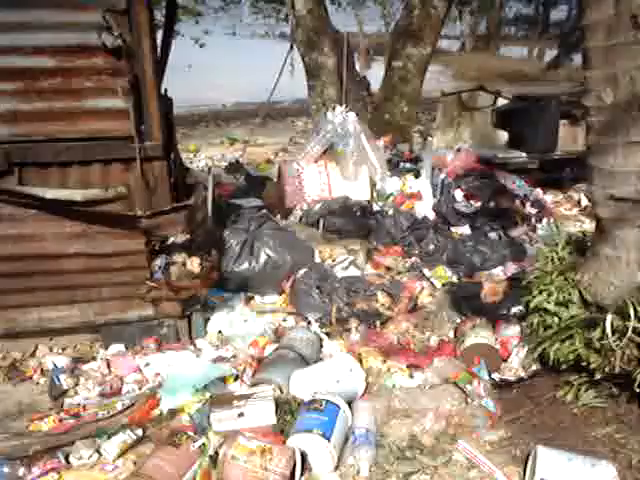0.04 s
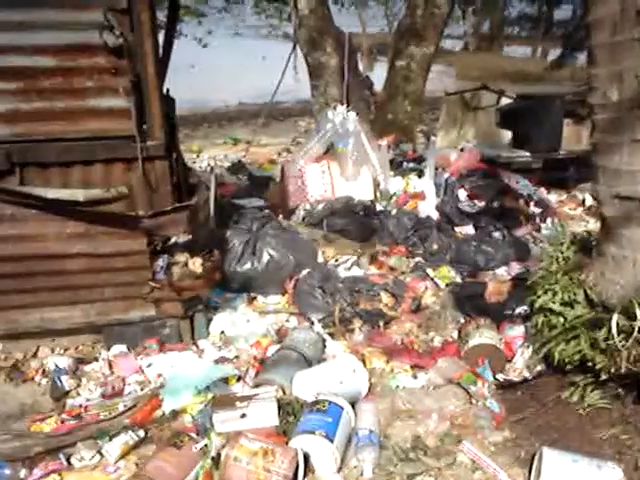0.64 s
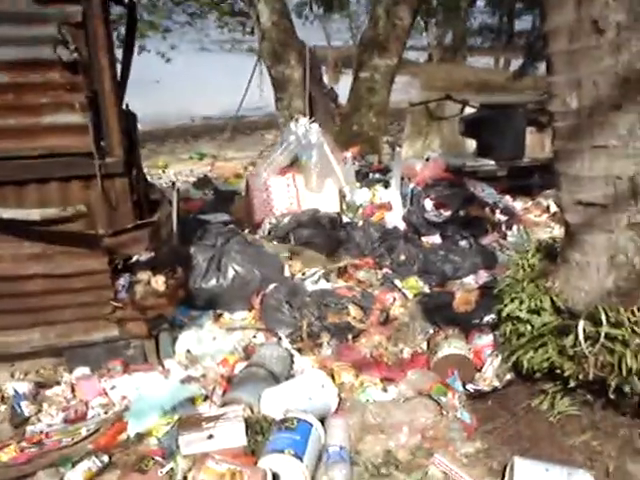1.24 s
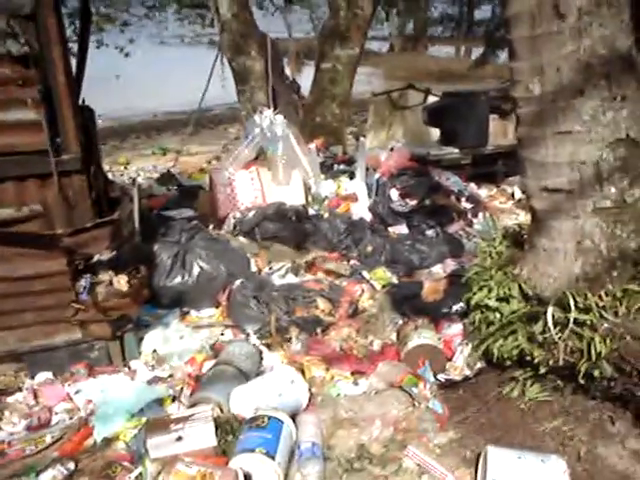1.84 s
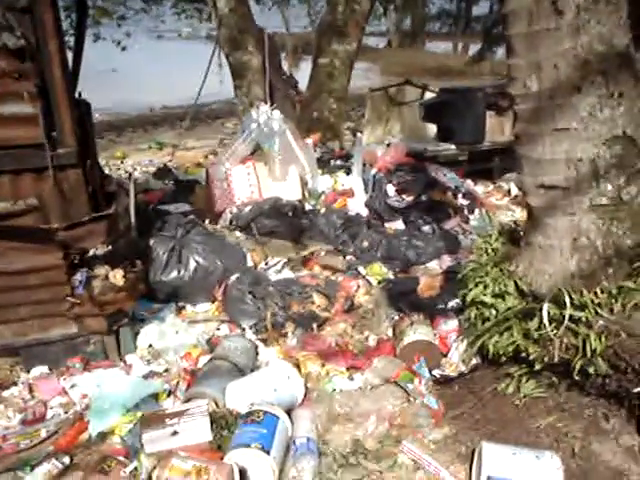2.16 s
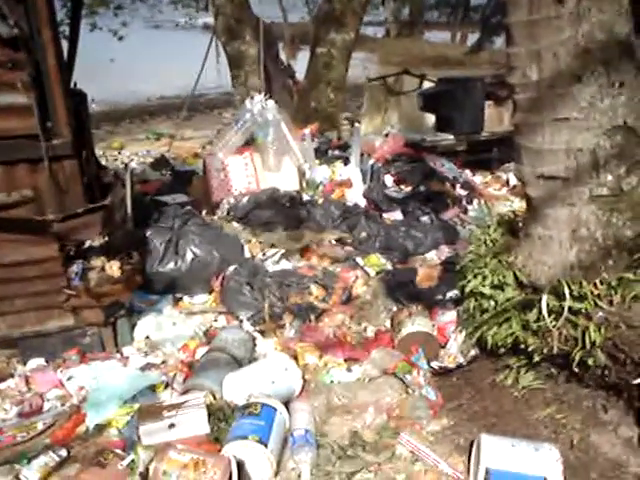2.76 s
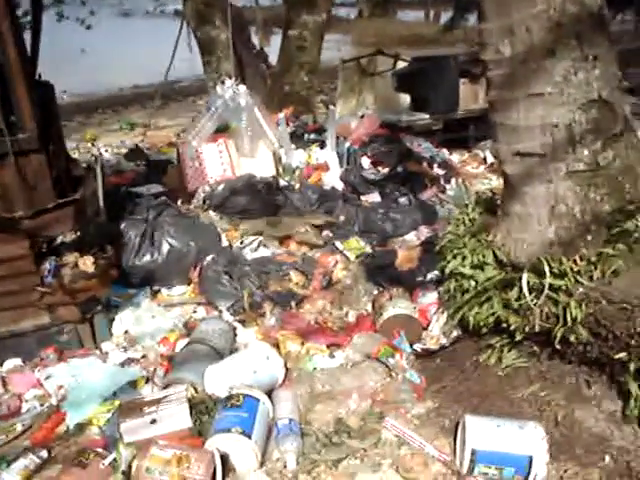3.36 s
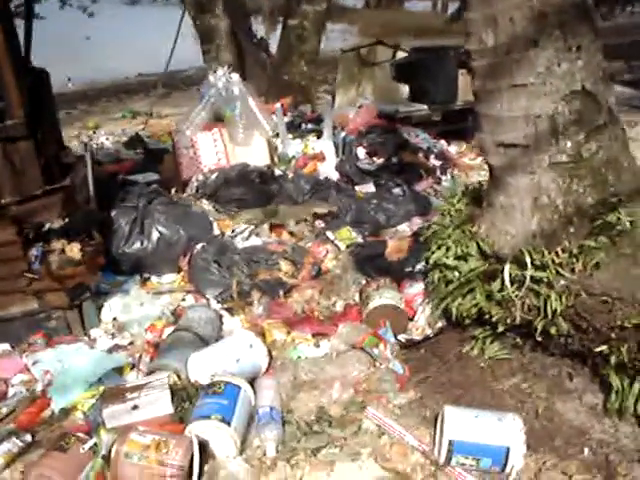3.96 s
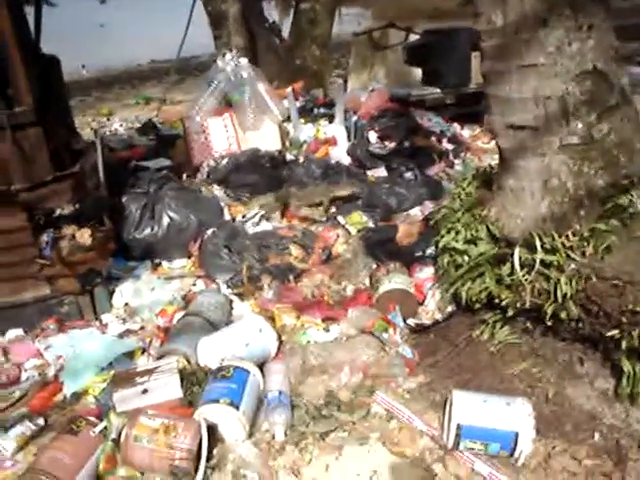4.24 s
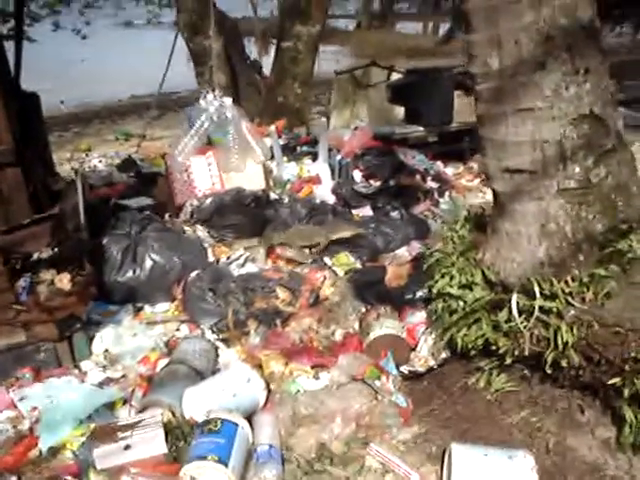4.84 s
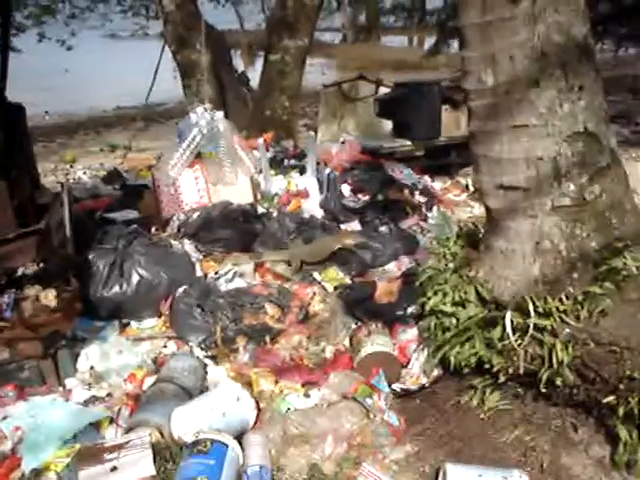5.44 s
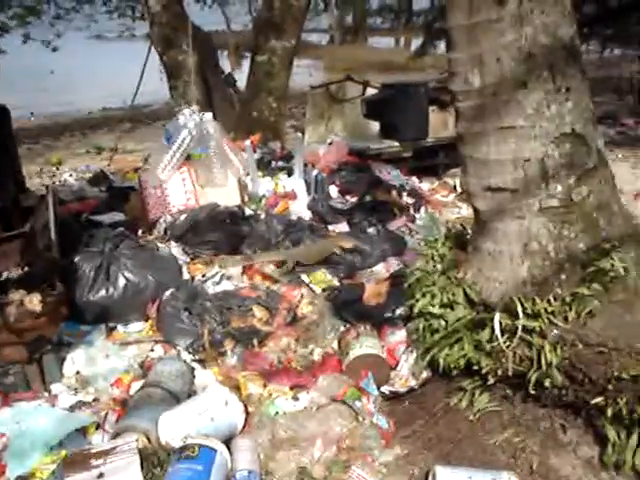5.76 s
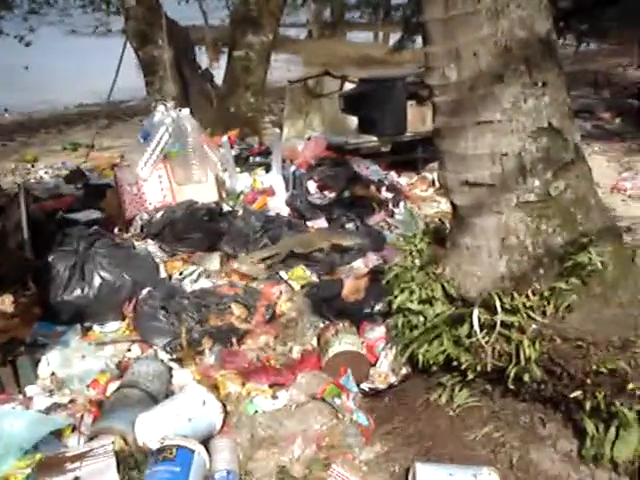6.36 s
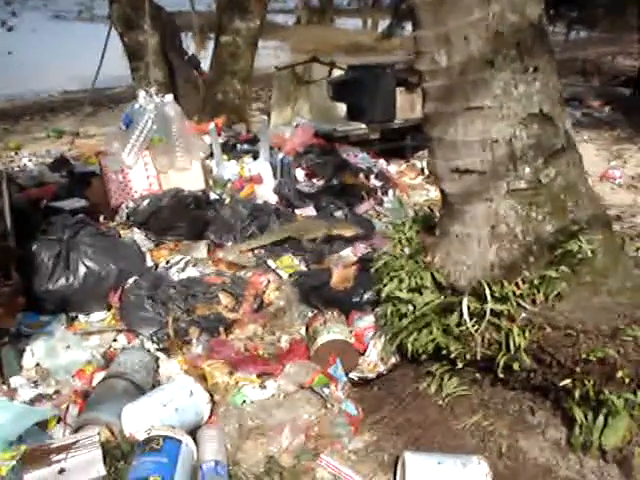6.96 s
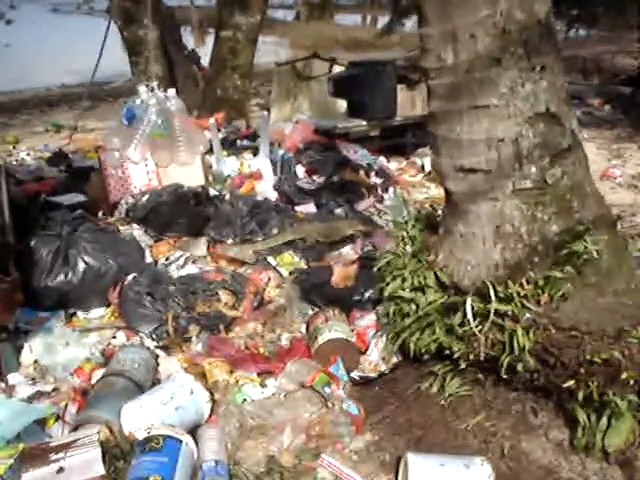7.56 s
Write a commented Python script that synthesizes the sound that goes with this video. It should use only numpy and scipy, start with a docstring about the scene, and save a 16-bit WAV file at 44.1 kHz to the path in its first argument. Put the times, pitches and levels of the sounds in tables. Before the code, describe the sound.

Wind buffets the microphone over a steady wash of water and leaves, while stiff plastic clicks and scrapes close by.

```python
"""Gusts buffet a small microphone over a steady wash of water and leaves, at a rubbish heap by the shore.
Close by, stiff plastic is handled: it clicks and ticks as it buckles and its panels ring, and twice
it scrapes in a quick run of slips. Thin plastic rustles faintly, soft contacts scuff, and a few
thin chirps come from far off."""
import sys
import numpy as np
from scipy import signal
from scipy.fft import rfft, irfft, next_fast_len
from scipy.io import wavfile
from scipy.ndimage import uniform_filter1d, map_coordinates

SR = 44100
rng = np.random.default_rng(int(sys.argv[2]) if len(sys.argv) > 2 else 0)


def transcribe(signal):
    """Save signal, clipped to [-1, 1], as a 16-bit WAV file at the path in sys.argv[1]."""
    frames = np.atleast_2d(signal).T
    limited = np.clip(frames, -1, 1)
    pcm = np.round(limited * 32767).astype(np.int16)
    wavfile.write(sys.argv[1], SR, pcm)


N = 334719


def amp(db):
    """Decibels to gain."""
    return 10 ** (np.asarray(db) / 20)


def unit(x):
    """x at rms 1."""
    return x / np.sqrt(np.mean(x ** 2) + 1e-20)


def add(out, start_s, sound):
    """Mix a sound into out."""
    out[round(start_s * SR):][:len(sound)] += sound


def wobble(rate_hz):
    """Smooth random curve, rate_hz knots a second."""
    knots = rng.standard_normal(int(N * rate_hz / SR) + 4)
    return map_coordinates(knots, [np.arange(N) * rate_hz / SR])


def swell(mid_s, length_s):
    """Bell-shaped gain, peak 1."""
    return np.exp(-(2 * (np.arange(N) / SR - mid_s) / length_s) ** 2)


def swells(rows, floor_db):
    """Power sum of swells over a steady floor, as a gain."""
    power = sum((amp(db) * swell(mid_s, length_s)) ** 2 for mid_s, length_s, db in rows)
    return np.sqrt(amp(floor_db) ** 2 + power)


def filtered(x, response):
    """x through a frequency response, given as a function of Hz."""
    size = next_fast_len(len(x) + 8192)
    return irfft(rfft(x, size) * response(np.fft.rfftfreq(size, 1 / SR)), size)[:len(x)]


def coloured(x, spectrum):
    """x shaped by (Hz, dB) points, at rms 1."""
    points_hz, db = np.transpose(spectrum)
    return unit(filtered(x, lambda hz: amp(np.interp(np.log(hz + 1), np.log(points_hz), db))))


def resonance(hz, centre_hz, width_hz):
    """Causal response of one damped mode."""
    return 1j * hz * width_hz / (centre_hz ** 2 - hz ** 2 + 1j * hz * width_hz)


def band(x, lo_hz, hi_hz):
    """Causal band-pass."""
    sos = signal.butter(2, [lo_hz, min(hi_hz, .45 * SR)], "band", fs=SR, output="sos")
    return signal.sosfilt(sos, x)


def rush(spectrum, patchy_db):
    """Noise at rms 1, its gain patchy in time and frequency."""
    bins = signal.stft(rng.standard_normal(N), nperseg=512)[2]
    patches = uniform_filter1d(rng.standard_normal(bins.shape), size=5, axis=0)
    patches = unit(uniform_filter1d(patches, size=14, axis=1))
    noise = signal.istft(bins * amp(patchy_db * patches), nperseg=512)[1][:N]
    return coloured(noise, spectrum)


def puff(mid_s, length_s, lo_hz, hi_hz):
    """Soft-edged burst of band noise."""
    envelope = np.exp(-((np.arange(N) / SR - mid_s) / (length_s / 2)) ** 4)
    return envelope * unit(band(rng.standard_normal(N), lo_hz, hi_hz))


def slips(per_s, spread_db):
    """Random impulses of uneven size."""
    impulses = (rng.random(N) < per_s / SR) * rng.choice([-1, 1], N)
    return impulses * amp(spread_db * np.clip(rng.standard_normal(N), -2, 2))


def chirps(half_band_hz=230):
    """Thin, hissy chirps from far off."""
    # Each row: middle in seconds, length in seconds, pitch in Hz, level in dB.
    calls = [(4.26, .09, 7600, -58), (5.1, .12, 4400, -54), (5.8, .09, 4400, -55), (5.96, .11, 7500, -55)]
    return sum(amp(db) * puff(mid_s, length_s, hz - half_band_hz, hz + half_band_hz)
               for mid_s, length_s, hz, db in calls)


def shore(gain_db=0.71, hiss_over_wash_db=-10):
    """Water and leaves make a broad wash under a smooth high hiss."""
    # Each row: time in seconds, level in dB before gain_db.
    levels = [(0.3, -39), (2.04, -39), (2.59, -37.5), (4.1, -39.5), (4.22, -42.5), (4.71, -42.5),
              (6.06, -40.5), (7.04, -40.5), (7.14, -42.5), (7.59, -41.5)]
    # Each row of both: frequency in Hz, relative level in dB.
    wash_spectrum = [(40, -36), (100, -12.5), (200, -3), (400, -3), (570, -0.5), (760, -3.5), (1000, -2),
                     (1600, -5), (2700, -8.5), (4300, -17.5), (6900, -28), (10000, -44.5)]
    hiss_spectrum = [(3000, -29), (5000, 1.5), (7200, -1.5), (8400, 10), (9400, 6.5), (10200, -1)]
    level_db = np.interp(np.arange(N) / SR, *np.transpose(levels))
    wash = amp(0.083 * wobble(rate_hz=4.5)) * rush(wash_spectrum, patchy_db=1.45)
    hiss = coloured(rng.standard_normal(N), hiss_spectrum)
    return amp(level_db + gain_db) * (wash + amp(hiss_over_wash_db) * hiss)


def wind(gain_db=0.9, lull_db=-54, flutter_db=2.0, thump_s=0.031, dull_hz=150):
    """Eddies thump the microphone; stronger gusts reach higher in pitch."""
    # Each row: middle in seconds, length in seconds, level in dB before gain_db.
    gusts = [(0.14, 0.39, -28.5), (0.42, 0.3, -24.5), (0.87, 0.38, -35), (2.15, 0.56, -46),
             (2.5, 0.39, -35.5), (3.02, 0.091, -34), (3.8, 0.27, -40), (4.42, 0.5, -40.5),
             (5.82, 0.22, -40), (6.11, 0.24, -38), (6.9, 0.96, -45)]
    # Single big eddies. Each row: middle in seconds, level in dB before gain_db.
    thumps = [(0.339, -21.5), (0.619, -22), (0.811, -25), (0.89, -27), (1.041, -25.5), (2.31, -34),
              (2.45, -28.5), (2.55, -28), (2.86, -38.5), (4.38, -27), (4.44, -32), (4.68, -31),
              (6.02, -34.5)]
    # Each row: frequency in Hz, relative level in dB.
    rumble_spectrum = [(12, -50), (25, -15.5), (45, -2.5), (68, 0), (100, -1.5), (150, -4), (220, -7.5),
                       (300, -16.5), (450, -49), (900, -57), (2000, -95)]
    buffet = swells(gusts + [(mid_s, thump_s, db) for mid_s, db in thumps], lull_db)
    buffet_db = 20 * np.log10(buffet) + flutter_db * wobble(rate_hz=28)
    eddies = coloured(rng.standard_normal(N), rumble_spectrum)
    slow_eddies = unit(filtered(eddies, lambda hz: 1 / (1 + (hz / dull_hz) ** 4)))
    force = np.clip((buffet_db + 36.0) / 18, 0, 1)
    air = (force * eddies + (1 - force) * slow_eddies) * amp(2.0 * wobble(rate_hz=35))
    running_rms = np.sqrt(np.abs(uniform_filter1d(air ** 2, size=2600)) + 1e-6)
    return amp(buffet_db + gain_db) * air / running_rms


def rustle(stir_db=-50.5):
    """Thin plastic crinkles in light swells over the faint stirring of the heap."""
    # Each row: middle in seconds, length in seconds, level in dB.
    rustles = [(0.36, 0.12, -44.5), (2.37, .09, -39.5), (2.61, 0.2, -41), (2.795, 0.045, -37.5),
               (3.5, 0.53, -45), (4.24, 0.075, -42), (4.38, 0.19, -44), (5.085, 0.058, -44),
               (5.8, 0.16, -46), (6.28, 0.28, -52)]
    # Each row: frequency in Hz, relative level in dB.
    crinkle_spectrum = [(400, -28.5), (800, -15), (1500, 8), (3000, 2.5), (4400, 2), (6500, -1),
                        (10000, -10)]
    crinkles = slips(per_s=2500, spread_db=3) * amp(2 * wobble(rate_hz=45))
    return swells(rustles, stir_db) * coloured(crinkles, crinkle_spectrum)


def scuffs(band_ratio=1.87):
    """Soft, dull contacts that ring nothing."""
    # Each row: middle in seconds, length in seconds, band centre in Hz, level in dB.
    contacts = [(0.823, 0.06, 1030, -36), (0.91, 0.045, 700, -40.5), (5.862, 0.047, 297, -38),
                (6.257, 0.1, 1110, -40)]
    return sum(amp(db) * puff(mid_s, length_s, hz / band_ratio, hz * band_ratio)
               for mid_s, length_s, hz, db in contacts)


def scrapes(rise_db_per_s=517, fall_db_per_s=1100, shell_db=-7):
    """Dense slips swell until the surface lets go, sounding through the plastic shell."""
    # Each row: moment of letting go in seconds, level in dB.
    releases = [(3.266, -16.5), (4.202, -18)]
    # Each row: frequency in Hz, relative level in dB.
    plastic_spectrum = [(150, -36), (450, -10.5), (750, -11), (1000, -13), (1500, -2.5), (2100, -5.5),
                        (2800, -1.5), (4200, -10), (6500, -15), (9500, -14)]
    # Each row: centre in Hz, width in Hz, relative gain in dB.
    shell_modes = [(1030, 150, 15), (1570, 390, 14), (2450, 400, -13), (3620, 130, -16), (4400, 140, -12)]
    drag_db, drag_lead_s, drag_s = -14.5, 0.018, 0.13  # lighter drag around each scrape
    t, grip = np.arange(N) / SR, 0
    for release_s, db in releases:
        push = amp(np.minimum(rise_db_per_s * (t - release_s), fall_db_per_s * (release_s - t)))
        drag = amp(drag_db) * swell(release_s - drag_lead_s, drag_s)
        grip = grip + amp(db) * np.maximum(push, drag)
    friction = slips(per_s=5000, spread_db=2.5)
    shell = filtered(friction, lambda hz: sum(amp(db) * resonance(hz, centre_hz, width_hz)
                                              for centre_hz, width_hz, db in shell_modes))
    return grip * unit(coloured(friction, plastic_spectrum) + amp(shell_db) * unit(shell))


def clicks(attack_s=0.0017, firm_db=-24):
    """Stiff plastic buckles with a spike and chatters; a panel rings low, its edge and rim high."""
    # Each row: start in seconds, relative level in dB, brightness in dB, panel ring in Hz,
    # chatter t60 in seconds.
    buckles = [(0.965, -32.5, -4.5, 1990, 0.019), (1.0204, -32.5, -4.5, 1870, 0.02),
               (1.705, -34.5, 4.5, 814, .018), (2.217, -19, 2, 1580, 0.026),
               (2.542, -29.5, -4.5, 1210, 0.041), (2.584, -23, -4.5, 1665, 0.04),
               (2.707, -26.5, -3, 1620, .032), (2.809, -29, -0.5, 1650, .038),
               (3.078, -30, 5.5, 920, 0.026), (3.198, -22.5, -4, 1015, 0.039),
               (3.517, -36.5, -9.5, 1520, .028), (3.872, -22.5, 5.5, 1700, 0.025),
               (3.905, -27.5, -3, 980, .035), (4.0653, -18, 0.5, 1460, 0.033), (4.183, -25, 6, 1350, 0.036),
               (4.194, -17.5, 2, 940, 0.035), (4.201, -23.5, -6, 1450, 0.039),
               (4.426, -36.5, -8.5, 1330, .034), (4.831, -38.5, -5, 950, .03), (5.34, -27, -2, 1055, 0.028),
               (5.395, -26.5, -4, 1000, 0.048), (5.401, -28, 0.5, 1050, 0.046),
               (5.512, -21, -1.5, 1030, 0.035), (5.599, -21, 0.5, 1020, .032),
               (6.07, -28.5, 6.5, 1520, .021), (6.103, -30, 4, 955, .021), (6.132, -28.5, 2, 1070, .026),
               (6.235, -29, -1, 910, .04), (6.281, -30.5, -1, 1530, 0.022), (6.303, -33.5, 0, 1820, 0.01),
               (6.352, -33.5, 0.5, 1570, 0.022), (7.1536, -21.5, -0.5, 1535, 0.018)]
    panel_db, panel_t60_s = -1.5, 0.02
    edge_hz, edge_db, rim_hz, rim_db, high_t60_s = 4330, -6, 6350, -8, 0.0056
    tail_db, body_db, crack_db, snap_db = -16.5, 1, 0.5, -1
    spike_db, spike_delay_s, reference_t60_s = 11.5, 0.000856, 0.022
    crack_growth, spike_growth = 0.25, 0.53  # extra dB per dB above a firm click
    out, t = np.zeros(N + SR), np.arange(SR // 10) / SR
    rise = 1 - np.exp(-t / attack_s)
    spike = band(signal.unit_impulse(len(t)), lo_hz=1400, hi_hz=5200)
    spike /= spike.max()

    def mode(hz, t60_s):
        """Decaying sine at rms 1."""
        return unit(np.sin(2 * np.pi * hz * t) * amp(-60 * t / t60_s) * rise)

    for start_s, db, bright_db, panel_hz, t60_s in buckles:
        chatter = rng.standard_normal(len(t)) * amp(-60 * t / t60_s) * rise
        bend = np.exp(0.06 * rng.standard_normal())  # flexing shifts the high modes
        body = unit(unit(band(chatter, 880, 2880)) + amp(panel_db) * mode(panel_hz, panel_t60_s))
        crack = unit(unit(band(chatter, 2170, 4200)) + amp(edge_db) * mode(edge_hz * bend, high_t60_s))
        snap = unit(unit(band(chatter, 5050, 11100)) + amp(rim_db) * mode(rim_hz * bend, high_t60_s))
        force_db = db - firm_db
        tail = (amp(body_db - bright_db) * body
                + amp(crack_db + crack_growth * force_db) * crack
                + amp(snap_db + bright_db) * snap)
        add(out, start_s, amp(db + tail_db) * tail)
        # Hard, short clicks open with the tallest spike.
        peak = amp(db + spike_db + spike_growth * force_db) * reference_t60_s / t60_s
        add(out, start_s + spike_delay_s, peak * spike)
    return out[:N]


def scene():
    """All sources at one microphone."""
    return (shore() + wind() + clicks() + scrapes() + rustle() + scuffs() + chirps())[None]


def record(dry, start_s=0.078, fade_s=0.004, top_hz=10060):
    """The microphone opens a moment late and passes nothing above its band limit."""
    fade_in = np.clip((np.arange(N) / SR - start_s) / fade_s, 0, 1)
    return filtered(dry[0] * fade_in, lambda hz: 1 / (1 + (hz / top_hz) ** 160))[None]


dry = scene()
out = record(dry)
transcribe(out)
```